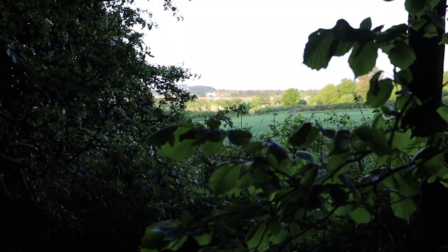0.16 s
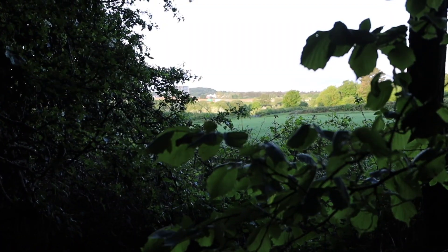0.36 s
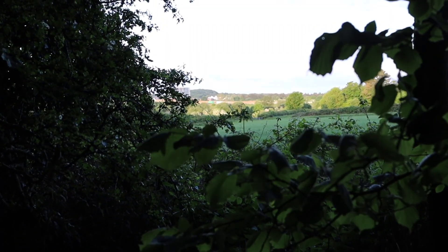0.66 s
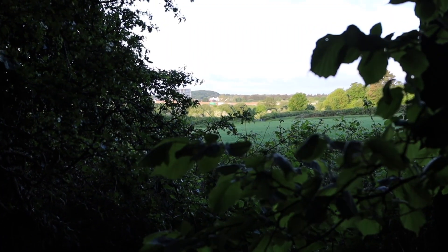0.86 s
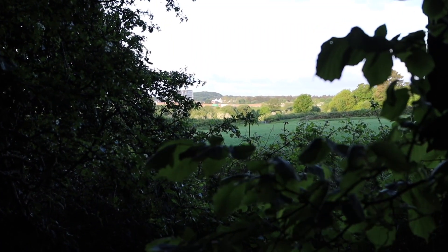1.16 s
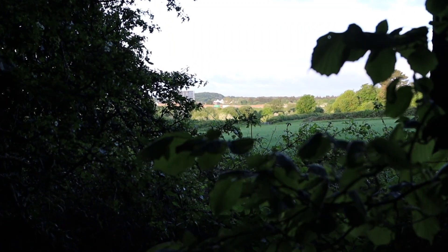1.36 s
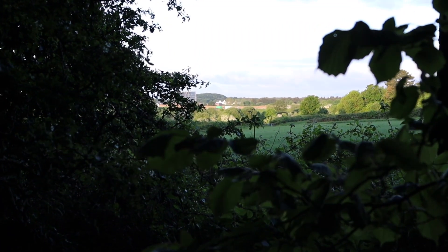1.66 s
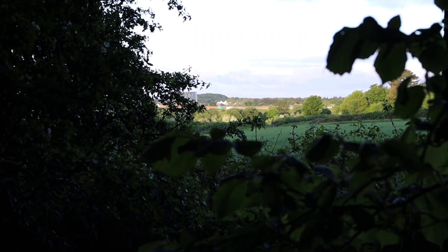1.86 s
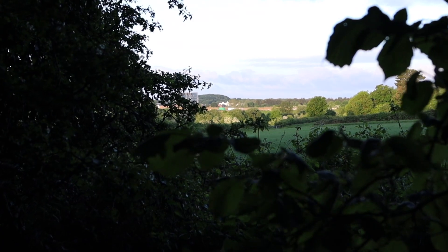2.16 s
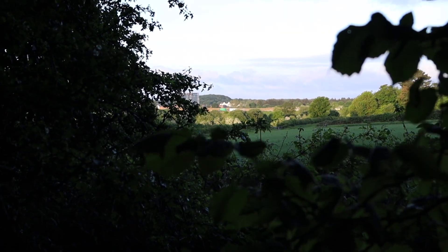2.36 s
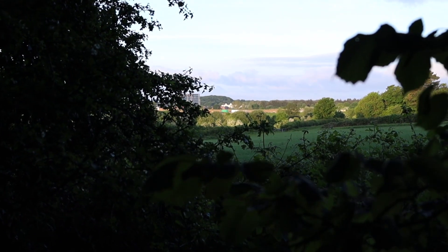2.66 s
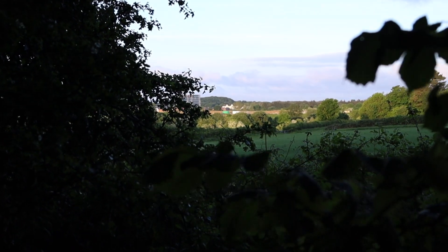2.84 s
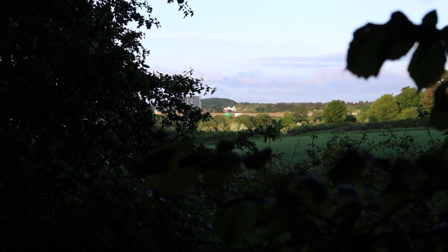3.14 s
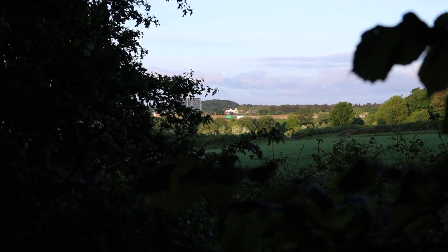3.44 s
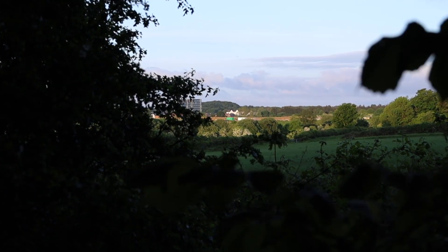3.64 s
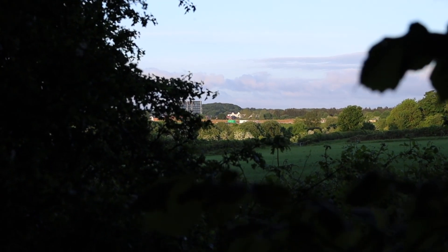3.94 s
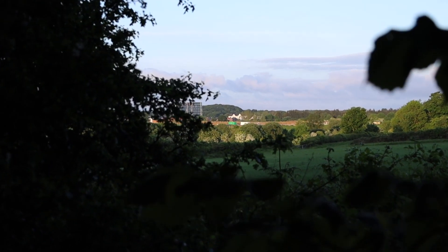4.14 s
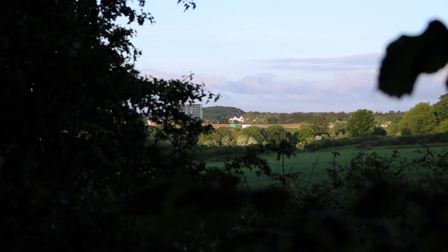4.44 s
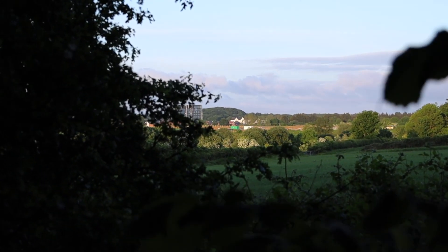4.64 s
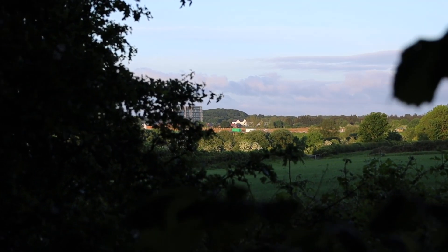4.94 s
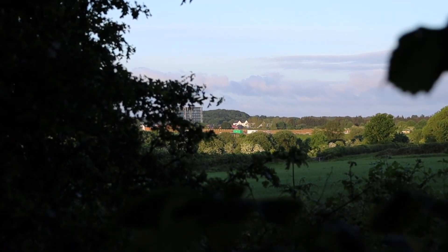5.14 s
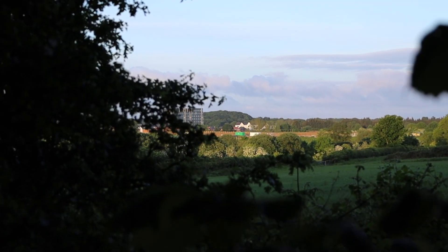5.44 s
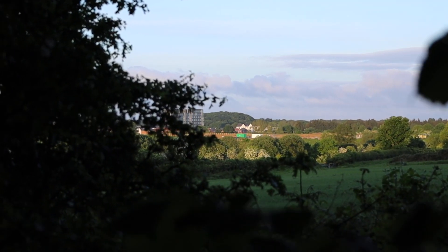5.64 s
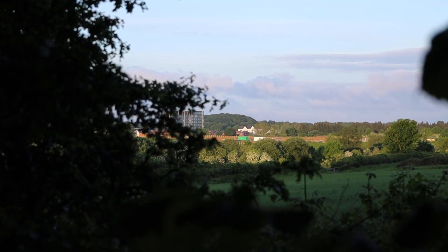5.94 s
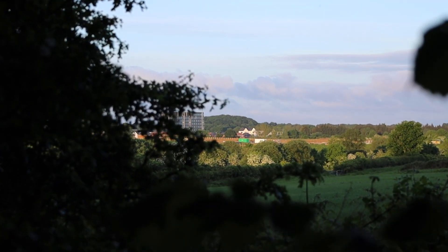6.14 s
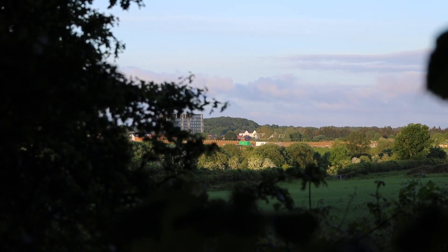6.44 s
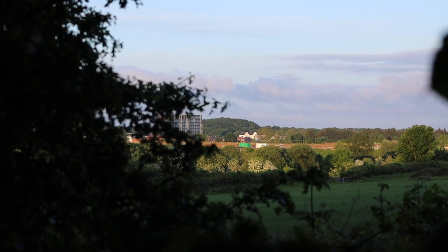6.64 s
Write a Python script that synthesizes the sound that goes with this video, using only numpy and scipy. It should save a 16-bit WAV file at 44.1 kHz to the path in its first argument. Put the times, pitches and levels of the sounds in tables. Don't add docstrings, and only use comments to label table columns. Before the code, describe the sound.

Small birds sing around a leafy hedge at a field edge, heard through a small microphone with little bass and soft, scattered tree echoes. From 0 to 0.3 s, piercing high whistles drop into a lower note. A thin high buzz near 1 s leads to a coarse pulsing buzz until about 1.8 s, with gentle falling whistles repeating behind it. From 2 to 3.6 s the song is busiest: loud chirps, sliding notes, rasps and rapid trills overlap. Between 3.6 and 4.2 s a rasp-flick-note ditty repeats five times, weakening. Clear chirps follow around 4.4-4.7 s, and a distant car swells softly near 4.9 s. Calls become sparse and faint until a brighter falling chirp at 6.65 s and a last flick. The far chorus, leaf hiss and road rush recede; dry twigs tick at 0.7 and 4.4 s.

```python
import sys
import numpy as np
from scipy import signal
from scipy.io import wavfile
from scipy.ndimage import uniform_filter1d

SR = 44100
rng = np.random.default_rng(int(sys.argv[2]) if len(sys.argv) > 2 else 0)


def waveform_to_disk(signal):
    frames = np.transpose(np.atleast_2d(signal))
    scaled = np.clip(frames, -1, 1) * 32767
    samples = np.round(scaled).astype(np.int16)
    wavfile.write(sys.argv[1], SR, samples)


def convert_level_to_amplitude(level_db):
    exponent = np.asarray(level_db, float) / 20
    return 10 ** exponent


N = 299439

# note_start_s, rasp_db, note_db
DITTY_BEATS = [
    (3.68, -51.5, -51),
    (3.798, -55, -51.5),
    (3.919, -60.5, -53),
    (4.036, -59.5, -53.5),
    (4.158, -62.5, -56.5),
]
# time_s, level_db
CHORUS_LEVEL = [(0, -54.5), (.5, -55.5), (1.8, -56.5), (2.7, -59), (3.6, -67), (4.9, -68), (6, -72.5),
                (6.79, -71.5)]


def songs():
    # start_s, length_s, pitch_hz, level_db
    chirp_holds = [(2.106, .016, 5030, -63), (2.355, 0.039, 5040, -56.5), (2.918, 0.021, 3370, -45.5),
                   (3.085, 0.023, 3640, -62.5), (3.31, .05, 5000, -63), (3.527, 0.014, 5230, -59.5),
                   (3.64, 0.031, 5070, -66), (3.722, 0.023, 6830, -71), (4.374, 0.086, 3680, -52),
                   (4.48, .064, 5270, -66), (4.549, .044, 5250, -57.5), (4.552, 0.021, 3604, -58.5),
                   (4.602, 0.035, 3640, -52), (4.657, .066, 5195, -57.5), (4.709, 0.15, 5193, -62.5),
                   (4.71, 0.033, 3634, -58.5), (4.72, 0.046, 5440, -63.5), (4.951, .031, 5190, -60.5),
                   (4.995, 0.078, 5250, -67), (5.032, 0.025, 3615, -64), (6.326, 0.044, 4060, -58.5)]
    # start_s, length_s, first_hz, last_hz, level_db
    chirp_slides = [(1.151, 0.028, 3090, 3190, -60), (1.89, 0.025, 6020, 5280, -56.5),
                    (2.304, .04, 3414, 3500, -42.5), (2.5, 0.0073, 4350, 4630, -44.5),
                    (2.579, 0.028, 4180, 3890, -48.5), (2.965, .016, 5450, 5030, -66),
                    (3.01, 0.02, 3940, 3350, -48), (3.107, 0.024, 5260, 4580, -65.5),
                    (3.308, .062, 4520, 4020, -47.5), (3.434, 0.023, 4000, 3680, -53),
                    (3.543, 0.054, 3380, 4030, -48.5), (4.275, 0.048, 4170, 3850, -54.5),
                    (4.68, .035, 5100, 4580, -77), (5.208, 0.09, 4010, 2410, -80.5),
                    (5.39, 0.016, 3300, 3720, -70.5), (5.565, 0.036, 3150, 3660, -69.5),
                    (5.762, 0.3, 6600, 6230, -76.5), (6.39, 0.056, 4880, 5700, -71.5)]
    # start_s, length_s, first_hz, last_hz, level_db
    hooks = [
        (2.15, 0.057, 4390, 3616, -44),
        (2.308, 0.016, 5600, 5270, -53.5),
        (2.458, .039, 3630, 4205, -45),
        (6.657, 0.02, 5000, 4200, -43.5),
    ]
    # start_s, length_s, pitch_hz, level_db
    rasp_holds = [(.379, .024, 3890, -60), (.7, 0.061, 3980, -56), (.965, .06, 4380, -60),
                  (2.64, 0.034, 4190, -50), (2.869, 0.037, 4280, -46.5), (3.063, 0.034, 2705, -55),
                  (3.39, 0.072, 4230, -56.5), (3.42, 0.066, 5560, -68), (4.131, 0.1, 7630, -77),
                  (4.151, 0.034, 7900, -84), (4.516, 0.026, 2680, -67), (4.735, 0.038, 2690, -78),
                  (5.072, 0.041, 4173, -55.5), (5.15, 0.04, 4130, -61), (5.316, 0.1, 4110, -60.5),
                  (5.559, 0.063, 4100, -58.5), (5.743, 0.027, 2880, -69.5), (6.403, 0.062, 3320, -70.5),
                  (6.56, 0.067, 2780, -74.5)]
    # start_s, length_s, first_hz, last_hz, level_db
    rasp_slides = [(.05, 0.02, 4150, 3820, -50), (2.335, 0.047, 3550, 4095, -44.5),
                   (2.365, 0.03, 3700, 3005, -51.5), (2.93, .042, 4220, 3660, -55.5),
                   (3.115, 0.039, 4040, 4330, -55), (3.171, .03, 4200, 4000, -53),
                   (3.215, 0.033, 3600, 3900, -55), (3.288, 0.016, 4120, 4830, -45),
                   (4.15, 0.044, 3010, 3150, -72.5), (5.94, 0.16, 3805, 2953, -67),
                   (6.51, 0.055, 3250, 2820, -81)]
    # length_s, first_hz, middle_hz, last_hz
    ditty_note = (.027, 3880, 3820, 3730)
    ditty_rasp, rasp_lead_s = (.045, 4060, 4150, 4120), .054
    # start_s, length_s, level_db
    trill_runs = [
        (2.727, .09, -43),
        (2.497, .083, -51),
        (2.552, .058, -64),
        (6.768, .024, -51),
        (6.754, .01, -71),
    ]
    # sweeps_per_s, from_hz, to_hz
    trill_strokes = [
        (66.8, 3300, 3750),
        (46.8, 5500, 4400),
        (84.5, 2800, 3050),
        (102, 3570, 4400),
        (98, 2400, 3100),
    ]

    clear = held(chirp_holds) + slid(chirp_slides) + slid(hooks, early=0.89)
    clear += again(ditty_note, [(s, db) for s, _, db in DITTY_BEATS])
    hoarse = held(rasp_holds) + slid(rasp_slides)
    hoarse += again(ditty_rasp, [(s - rasp_lead_s, db) for s, db, _ in DITTY_BEATS])
    mix = notes(clear, .007, 2.6) + leaves(notes(hoarse, .015, 3.5))
    for (s, length_s, db), stroke in zip(trill_runs, trill_strokes):
        add(mix, s, trill(length_s, *stroke, db))
    return mix


def chips():
    # start_s, length_s, low_hz, high_hz, level_db
    flicks = [(0.0, 0.077, 3590, 5520, -48.5), (1.46, 0.076, 6850, 8500, -65.5),
              (2.642, 0.024, 4520, 6400, -52), (2.747, 0.03, 1710, 2330, -69),
              (2.822, .022, 4460, 5530, -68), (2.884, 0.022, 1985, 2940, -65),
              (3.058, 0.051, 3540, 4770, -57.5), (3.159, .074, 4180, 5900, -60),
              (3.262, 0.014, 4430, 5420, -55), (3.389, 0.014, 4370, 5620, -57.5),
              (4.26, .023, 4210, 5550, -62), (3.3, 0.16, 3600, 5000, -55.5), (2.865, .1, 3550, 4600, -55)]
    ditty_flick, lead_s = (.025, 4300, 5600), .03  # length_s, low_hz, high_hz
    ditty_flicks = [(s - lead_s, *ditty_flick, db - 6) for s, db, _ in DITTY_BEATS]
    mix = np.zeros(N)
    for s, length_s, low_hz, high_hz, db in flicks + ditty_flicks:
        swell_db = db - 9 * np.linspace(-1, 1, round(length_s * SR)) ** 2
        add(mix, s, warble(swell_db, 170, low_hz, high_hz, uneven=.3))
    return mix


def fluting():
    # start_s, length_s, pitch_hz, level_db
    flute_holds = [(.21, 0.078, 2070, -73), (.401, 0.19, 1060, -73), (.718, .094, 2020, -76),
                   (.842, 0.041, 1025, -71), (1.4, 0.033, 3140, -71), (1.546, 0.17, 1730, -70.5),
                   (1.84, 0.058, 2143, -66), (2.027, 0.095, 2034, -64.5), (2.305, .055, 2130, -66),
                   (2.548, .092, 1880, -59), (2.722, .055, 2550, -66), (3.004, .03, 2830, -51),
                   (3.09, 0.017, 2330, -61), (4.101, 0.024, 2810, -71.5), (5.523, 0.057, 2490, -76),
                   (5.66, 0.13, 2194, -78), (5.92, 0.13, 2080, -88.5), (5.924, .054, 2850, -78)]
    # start_s, length_s, first_hz, last_hz, level_db
    flute_slides = [(.135, .15, 3450, 2000, -63), (.64, .054, 3400, 2730, -64), (.89, .03, 3150, 2800, -66),
                    (1.117, .058, 3000, 2290, -63), (1.232, .038, 2200, 2000, -74),
                    (1.48, .05, 3350, 3050, -64), (1.815, .025, 1800, 2150, -68),
                    (2.02, .05, 3380, 3000, -61), (2.2, .073, 3450, 2780, -67.5),
                    (2.355, .055, 2050, 1680, -70), (2.49, .077, 3520, 2640, -67),
                    (2.945, .078, 3450, 2980, -57.5), (3.03, .03, 2880, 3300, -52),
                    (3.05, .05, 3000, 2350, -62), (3.31, .018, 3370, 2990, -50),
                    (3.388, .034, 3280, 3110, -51.5), (3.585, .022, 3700, 2930, -59),
                    (3.822, .036, 3180, 2780, -66.5), (3.855, .053, 2960, 3500, -54.5),
                    (3.897, .045, 3420, 2520, -62.5), (4.849, .05, 2950, 2650, -75),
                    (5.329, .05, 3680, 3000, -66), (5.54, .026, 3220, 2920, -69)]
    # length_s, first_hz, middle_hz, last_hz
    swoop = (.092, 3620, 2770, 2300)
    pip = (.028, 3000, 3150, 3310)
    drip = (.028, 2500, 2290, 2150)
    # start_s, level_db
    swoops = [(1.252, -59), (1.41, -57.5), (1.556, -60), (1.702, -61.5), (1.869, -62)]
    pips = [(1.19, -62), (1.375, -61), (1.622, -61), (1.825, -61), (3.278, -53)]
    drips = [(5.04, -79.5), (5.11, -78.5), (5.207, -80), (5.275, -77), (5.36, -84), (6.16, -83.5),
             (6.62, -84)]
    rows = slid(flute_slides) + again(swoop, swoops) + again(pip, pips) + again(drip, drips)
    return notes(held(flute_holds), .004, 1.2) + notes(rows, .006, 2.8)


def buzzes():
    # start_s, length_s, first_hz, last_hz, level_db
    opening = [(.01, 0.073, 5660, 5220, -48), (.056, 0.052, 6000, 5850, -34.5),
               (.106, 0.0412, 5750, 5370, -33), (.115, 0.19, 5514, 5420, -44.5),
               (.115, 0.14, 5950, 5940, -50.5), (.209, 0.038, 3983, 3840, -37.5),
               (.239, .05, 3934, 3390, -43.5), (.25, 0.076, 3970, 3950, -50)]
    # time_s, level_db
    buzz_effort = [
        (1.035, -49),
        (1.09, -39.5),
        (1.2, -42),
        (1.62, -42),
        (1.72, -46),
        (1.89, -65.5),
    ]
    # time_s, level_db
    high_effort = [
        (.955, -55.5),
        (.985, -45.5),
        (1.03, -48),
        (1.07, -53.5),
        (1.12, -49.5),
    ]
    # time_s, level_db
    seep_effort = [
        (1.745, -50),
        (1.77, -47.5),
        (1.85, -48.5),
        (1.89, -44),
        (1.97, -55),
        (2.065, -58),
    ]
    mix = notes(slid(opening), 0.004, 4.2)
    s, db = played(buzz_effort)
    t = s + np.arange(len(db)) / SR
    heave = np.cos(2 * np.pi * (t - 1.076) / 0.176)
    low_hz = 3980 + 480 * (t - s)
    top_db = 3.5 * heave + .6 * (db - db.max())
    add(mix, s, warble(db + 1.5 + 2.5 * heave, 101, low_hz, 6300, top_db))
    add(mix, *long_buzz(high_effort, 95, 6900, 8290))
    add(mix, *long_buzz(seep_effort, 53, 7540, 7860))
    return mix


def whistle(length_s, first_hz, middle_hz, last_hz, db, wobble=0.0066, throb_db=3.5):
    u = np.linspace(-1, 1, round((length_s + 0.0046) * SR))
    bend_hz = (first_hz + last_hz) / 2 - middle_hz
    hz = middle_hz + (last_hz - first_hz) * u / 2 + bend_hz * u ** 2
    hz = hz * (1 + wobble * drift(len(u), 190))
    shape = np.cos(u * np.pi / 2) ** .55
    return convert_level_to_amplitude(db + throb_db * drift(len(u), 130)) * shape * tone(hz)


def trill(length_s, per_s, from_hz, to_hz, db):
    strokes = max(round(length_s * per_s), 1)
    turn = (np.arange(round(strokes / per_s * SR)) * per_s / SR) % 1
    stroke = np.clip(turn / .62, 0, 1)
    return convert_level_to_amplitude(db + 6.5) * np.sin(np.pi * stroke) ** 2 * tone(from_hz + (to_hz - from_hz) * stroke)


def warble(db, per_s, low_hz, high_hz, top_db=-1.5, uneven=.15):
    count = len(db)
    swing = np.sin(2 * np.pi * np.cumsum(per_s * (1 + uneven * drift(count, 60))) / SR)
    reach = 1 - .17 * abs(drift(count, 70))
    hz = (low_hz + high_hz) / 2 + (high_hz - low_hz) / 2 * swing * reach
    return convert_level_to_amplitude(db + top_db * swing) * tone(hz) * signal.windows.tukey(count, .1)


def long_buzz(rows, per_s, low_hz, high_hz):
    s, db = played(rows)
    return s, warble(db + 4.5, per_s, low_hz, high_hz)


def notes(rows, wobble, throb_db):
    mix = np.zeros(N)
    for s, *note in rows:
        add(mix, s - .002, whistle(*note, wobble, throb_db))
    return mix


def held(rows):
    droop = .008
    return [(s, length_s, hz * (1 + droop), hz, hz * (1 - droop), db) for s, length_s, hz, db in rows]


def slid(rows, early=.58):
    return [(s, length_s, a, a + early * (b - a), b, db) for s, length_s, a, b, db in rows]


def again(shape, rows):
    return [(s, *shape, db) for s, db in rows]


def played(rows):
    s, *columns = np.transpose(rows)
    t = np.arange(s[0], s[-1], 1 / SR)
    return s[0], *(np.interp(t, s, c) for c in columns)


def tone(hz):
    return np.sqrt(2) * np.sin(2 * np.pi * np.cumsum(hz) / SR)


def drift(count, per_s):
    knots = rng.standard_normal(400)
    return np.interp(np.arange(count) * per_s / SR, np.arange(400), knots)


def add(mix, s, sound):
    part = mix[max(round(s * SR), 0):][:len(sound)]
    part += sound[:len(part)]


def ticks():
    # start_s, peak_db, centre_hz
    snaps = [
        (.328, -47, 6400),
        (.738, -40, 7650),
        (2.572, -53, 10650),
        (4.357, -38, 7200),
        (6.606, -51, 5260),
    ]
    mix, t = np.zeros(N), np.arange(-60, 60) / SR
    for s, db, hz in snaps:
        snap = np.exp(-(t * hz / 1.5) ** 2) * np.sin(2 * np.pi * hz * t)
        add(mix, s - 60 / SR, convert_level_to_amplitude(db) * snap)
    return mix


def leaves(x):
    lowpass = signal.butter(4, 110, fs=SR, output="sos")
    tremble = signal.sosfilt(lowpass, rng.standard_normal(N))
    return x * (.75 + .65 * evened(tremble))


def trees(x, first_s, depth):
    # freq_hz, t60_s
    wood_t60 = [
        (1500, 0.94),
        (4000, 0.76),
        (8000, 0.24),
    ]
    start, taps = round(first_s * SR), np.zeros(SR // 2)
    at = np.arange(0, SR // 2 - 20, 20)
    taps[at + rng.integers(0, 20, len(at))] = rng.choice([-1., 1.], len(at))
    taps[:start] = 0
    hz, t, z = signal.stft(taps, SR, nperseg=256)
    t60_s = depth * read(wood_t60, hz)[:, None]
    tail = signal.istft(z * convert_level_to_amplitude(-60 * t / t60_s), SR, nperseg=256)[1]
    return signal.fftconvolve(x, tail / np.linalg.norm(tail))[:N]


def far_birds(t):
    # freq_hz, level_db_per_hz
    murmur = [(1060, -41), (1800, -17), (1990, -12.5), (2590, -14), (3020, -7.5), (3980, 3.5), (4470, -2.5),
              (4810, -3), (7760, -21), (9000, -34.5), (11700, -54), (19800, -120)]
    mix = np.zeros(N)
    for s, length, place, slide, size in rng.random((900, 5)):
        hz = 2500 * 2.4 ** place
        bend_hz = hz * .3 * (slide - .6)
        db = read(murmur, hz) + 6 * size
        add(mix, s * N / SR, whistle(.015 + .05 * length, hz - bend_hz, hz, hz + .6 * bend_hz, db))
    chatter = evened(trees(mix, .004, 0.74) + 0.29 * mix)
    return convert_level_to_amplitude(chorus_db(t)) * evened(.9 * chatter + wash(murmur, 1.8))


def chorus_db(t):
    return np.interp(t, *np.transpose(CHORUS_LEVEL))


def shrill_birds(t):
    # freq_hz, level_db_per_hz
    twitter = [
        (3500, -33.5),
        (4800, 0.5),
        (6300, -1),
        (8500, -21.5),
    ]
    return convert_level_to_amplitude(-58 - 27 * step(t, 2, .3)) * wash(twitter, 2.0)


def breeze(t):
    # freq_hz, level_db_per_hz
    hiss = [(1500, -31.5), (2500, -3.5), (5000, 1), (8000, 3), (10000, -6), (12000, -5), (14000, -10.5),
            (16000, -13.5)]
    hiss_db = -68 - 11 * step(t, 0.9, 0.46) - 0.74 * t
    return convert_level_to_amplitude(hiss_db + 6.0) * wash(hiss, 3.5)


def traffic(t):
    # freq_hz, level_db_per_hz
    road = [(88, -71), (150, -59), (295, -22), (398, -17.5), (614, -7.5), (666, -4), (1040, 1), (1300, -8),
            (1690, -33.5), (2860, -120)]
    tyres = [(700, -35), (1000, -8.5), (1300, 0), (1550, -2), (1800, -11.5), (2500, -28.5)]
    road_db = -77 - 8.5 * step(t, 5.45, 0.38)
    far_db = chorus_db(t)
    pass_db = 11.5 * np.exp(-((t - 4.915) / 0.2) ** 2)
    tyres_db = -77 + .55 * (far_db - far_db[0]) + pass_db
    return convert_level_to_amplitude(road_db) * wash(road, 1.3) + convert_level_to_amplitude(tyres_db) * wash(tyres, 1.9)


def wash(spectrum, patchy_db):
    frames, hz = N // 256 + 5, np.fft.rfftfreq(1024, 1 / SR)
    a, b, patches = rng.standard_normal((frames, 513, 3)).T
    patches = evened(uniform_filter1d(uniform_filter1d(patches, 10, 0), 12, 1))
    z = (a + 1j * b) * convert_level_to_amplitude(read(spectrum, hz)[:, None] + patchy_db * patches)
    return evened(signal.istft(z, nperseg=1024, noverlap=768)[1][:N])


def read(points, hz):
    f, value = np.transpose(points)
    return np.interp(np.log(hz + 1), np.log(f + 1), value)


def evened(x):
    return x / np.sqrt(np.mean(x ** 2) + 1e-20)


def step(t, at_s, width_s):
    return (1 + np.tanh((t - at_s) / width_s)) / 2


def scene():
    flutes, near, wood = fluting() + ticks(), songs() + chips(), buzzes()
    hedge_echo = trees(leaves(convert_level_to_amplitude(-13) * flutes + convert_level_to_amplitude(-5.5) * near), .004, .47)
    wood_echo = trees(wood, .004, 1.27)
    birds = flutes + near + hedge_echo + convert_level_to_amplitude(-6.5) * wood + convert_level_to_amplitude(-4.5) * wood_echo
    t = np.arange(N) / SR
    back = far_birds(t) + shrill_birds(t) + breeze(t) + traffic(t)
    return (birds + back)[None]


def low_pass(x):
    return signal.sosfilt(signal.butter(12, 15650, fs=SR, output="sos"), x)


def record(dry):
    highpass = signal.butter(3, 230, "highpass", fs=SR, output="sos")
    self_noise = convert_level_to_amplitude(-100) * rng.standard_normal(dry.shape)
    return low_pass(signal.sosfilt(highpass, dry) + self_noise)


dry = scene()
out = record(dry)
waveform_to_disk(out)
```